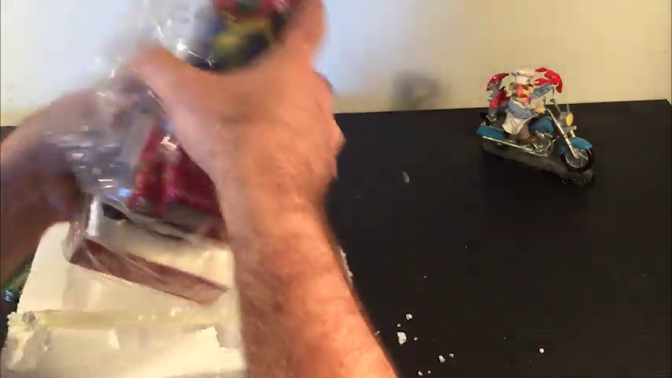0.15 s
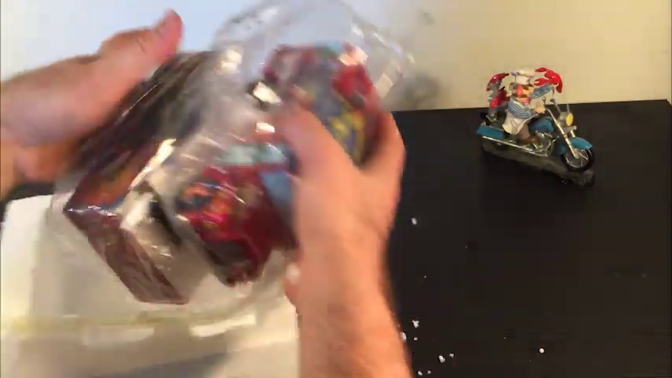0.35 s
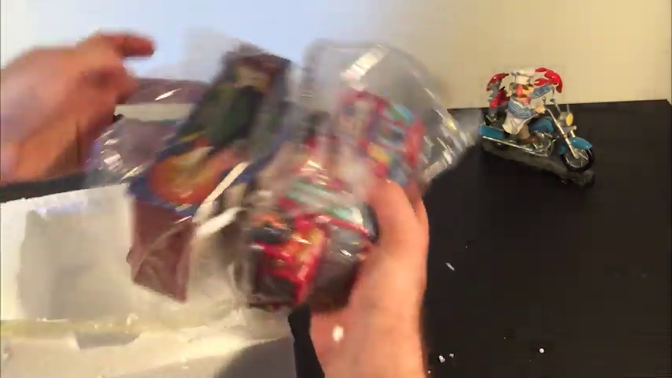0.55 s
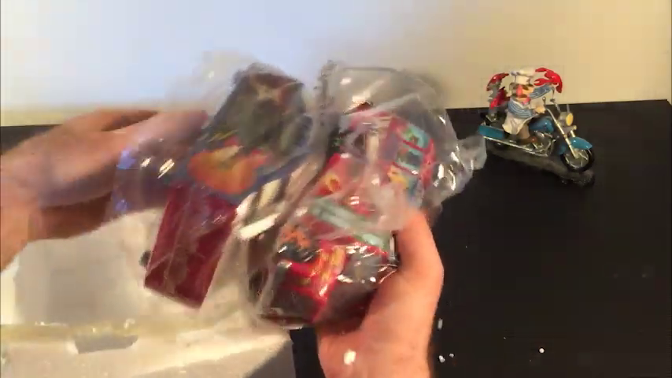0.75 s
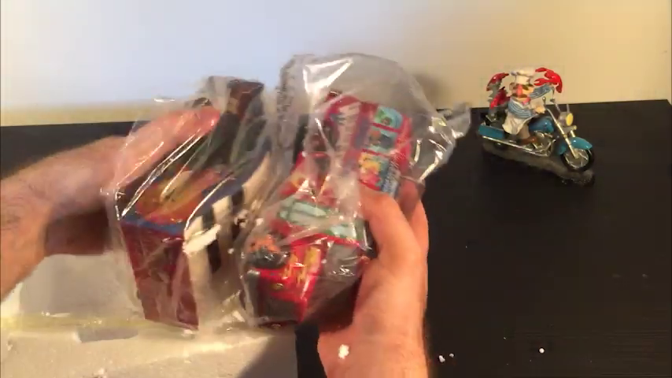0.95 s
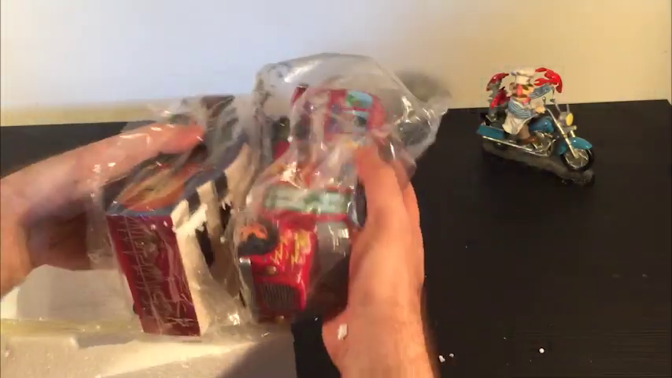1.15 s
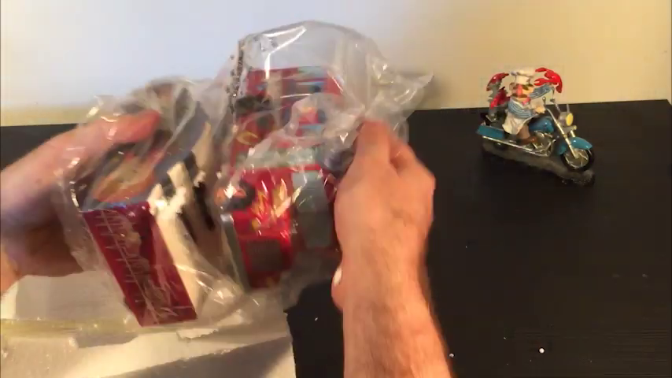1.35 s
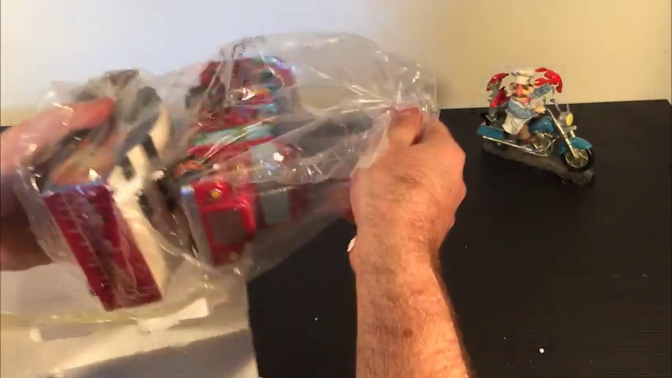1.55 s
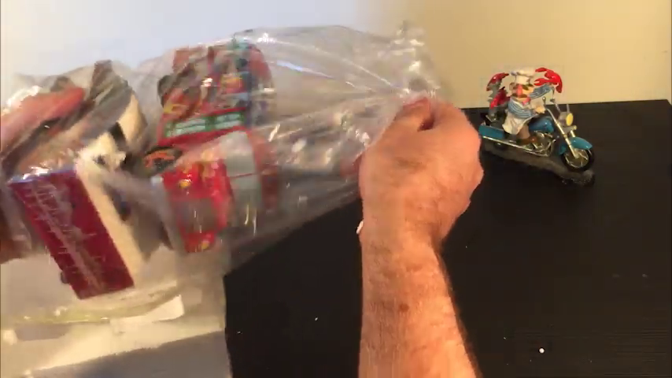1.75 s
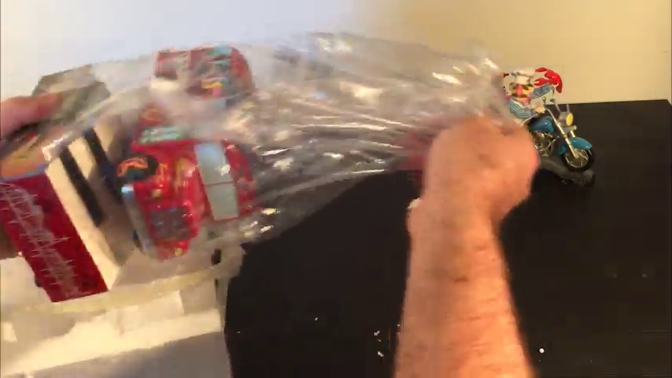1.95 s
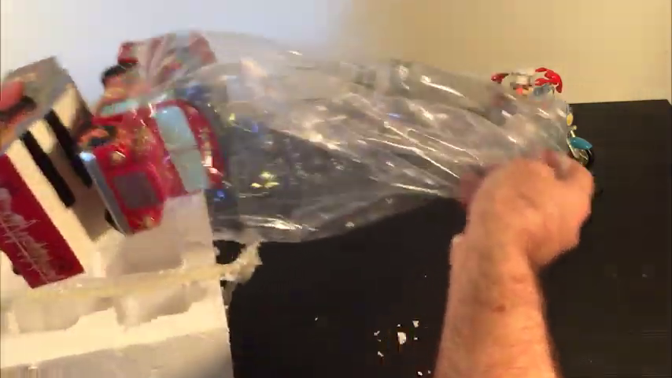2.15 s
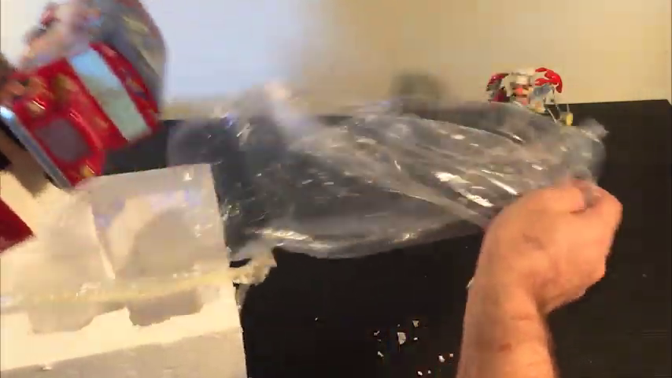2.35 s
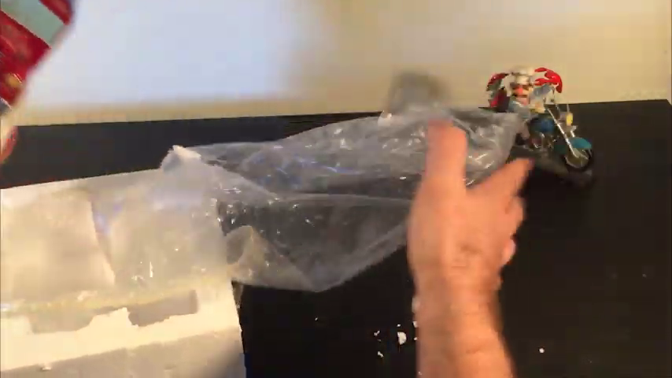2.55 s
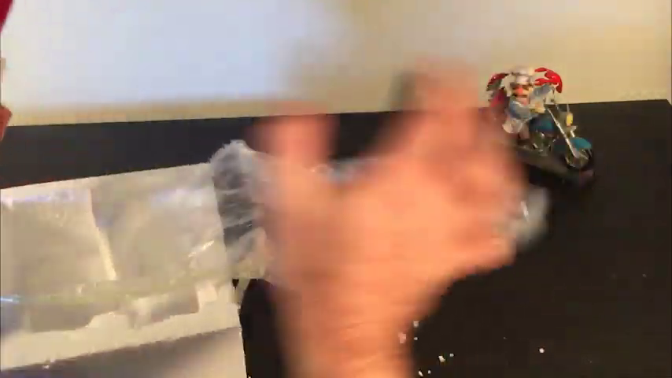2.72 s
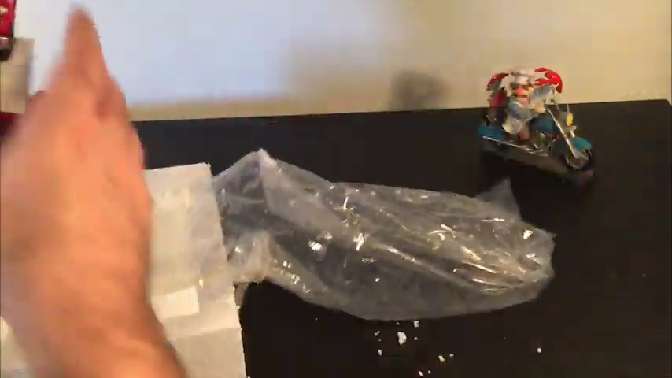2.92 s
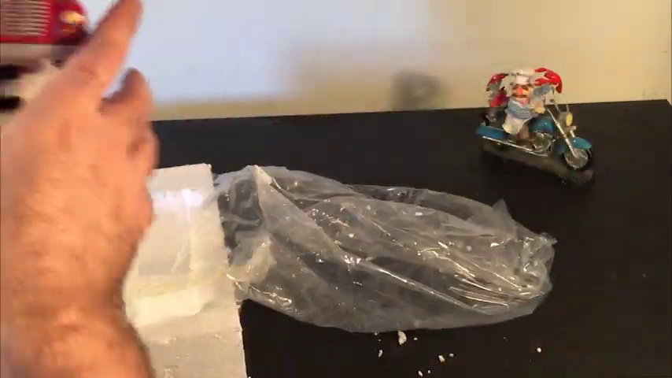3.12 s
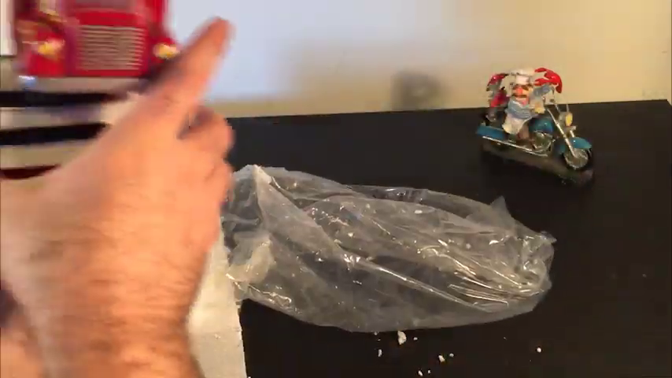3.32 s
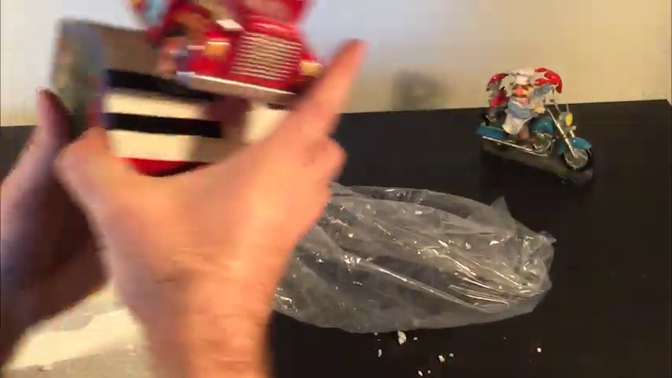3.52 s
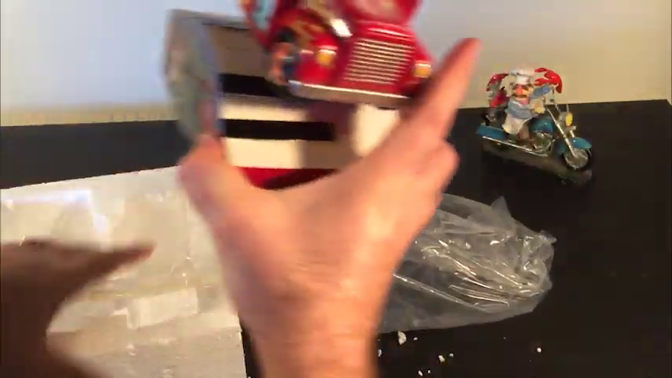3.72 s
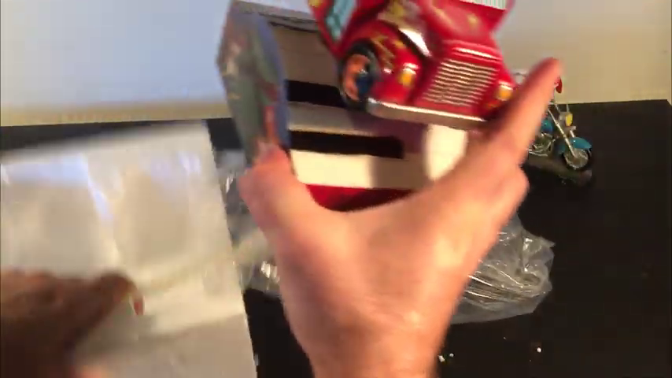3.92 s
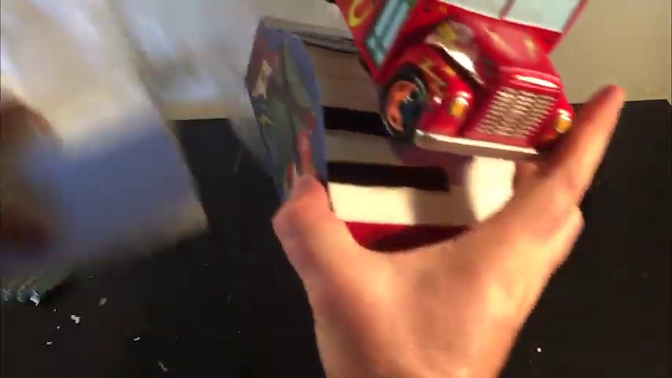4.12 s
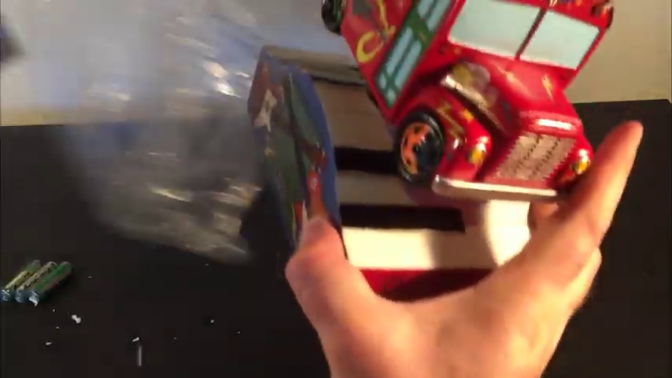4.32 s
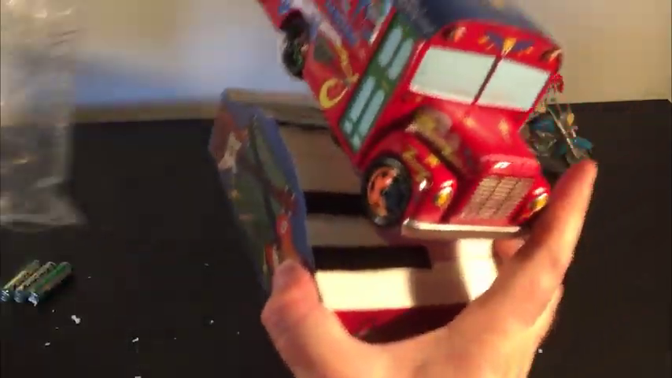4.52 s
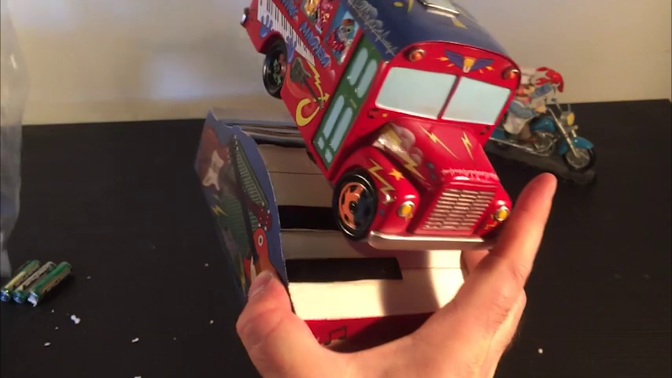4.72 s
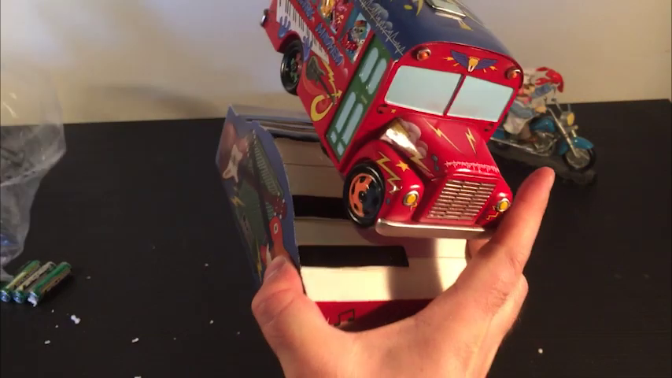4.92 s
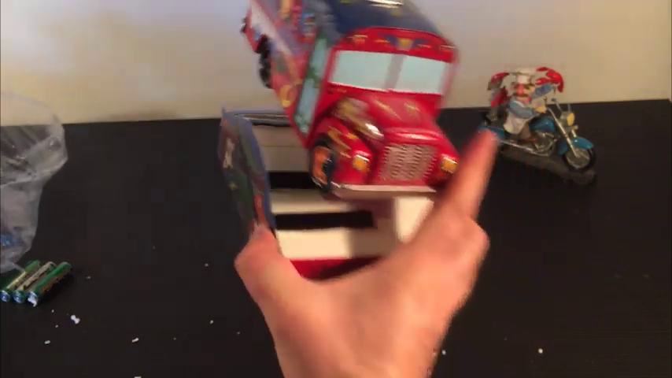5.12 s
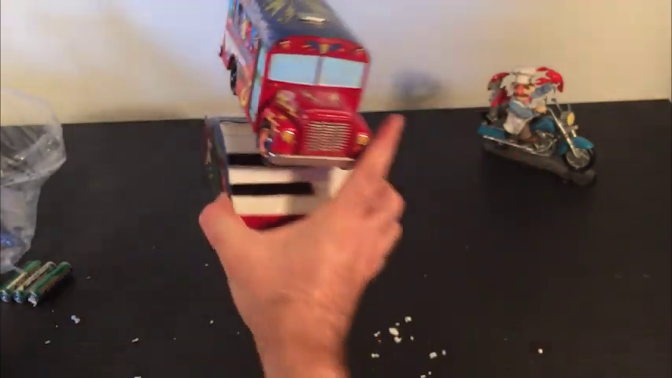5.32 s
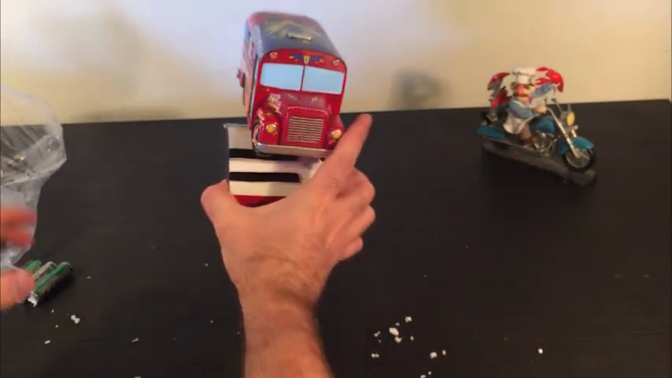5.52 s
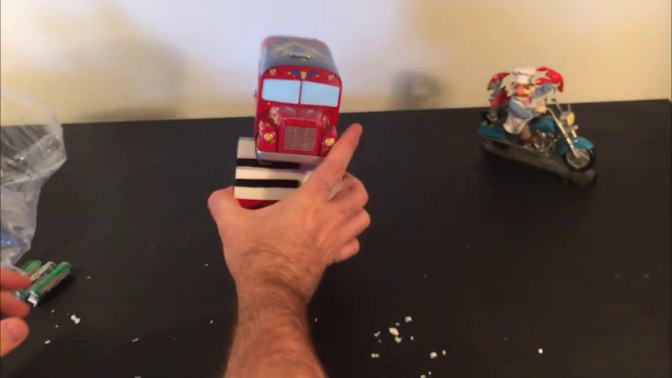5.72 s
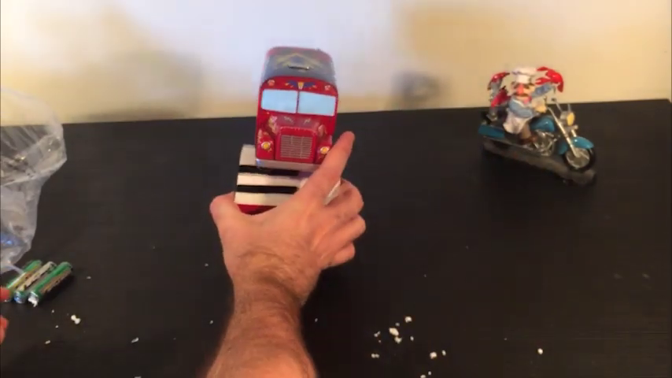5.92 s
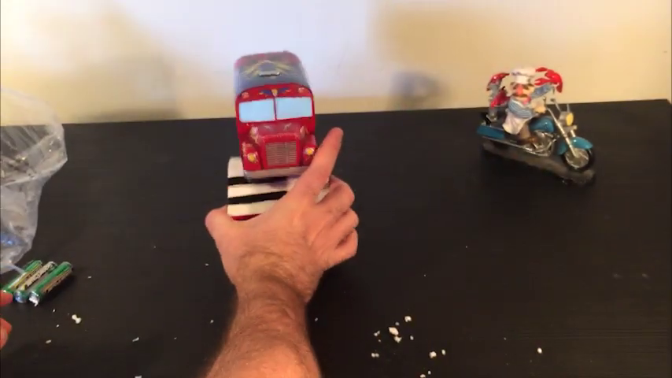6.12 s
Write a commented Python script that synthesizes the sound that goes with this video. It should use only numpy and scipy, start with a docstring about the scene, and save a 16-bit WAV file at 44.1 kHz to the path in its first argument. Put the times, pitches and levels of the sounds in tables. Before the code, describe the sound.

Thin plastic crinkles and snaps as it is pulled off a toy, then thins to scattered clicks and soft knocks on a wooden table.

```python
"""Dense crackle with single louder snaps: hands pull a thin plastic bag off an ornament, then slide
foam packing and bag aside. Creases in the film buckle as clicks; skin, film and foam rub briefly.
Things knock on a wooden table and ring its modes.
A small quiet room with a low rumble, heard by one microphone."""
import sys
import numpy as np
from scipy import signal
from scipy.io import wavfile

SR = 44100
rng = np.random.default_rng(int(sys.argv[2]) if len(sys.argv) > 2 else 0)


def wrap_up_sound(samples):
    """Save the sound to the file named by the first command line argument, as 16-bit audio."""
    columns = np.atleast_2d(samples).T
    # keep every value between -1 and 1, then stretch to whole-number steps
    tamed = np.clip(columns, -1, 1)
    steps = np.round(tamed * 32767).astype(np.int16)
    wavfile.write(sys.argv[1], SR, steps)


N = 276066
FULL_EFFORT_DB = -47


def crackle():
    """Creases buckle at random in clumps; each clicks around its own random pitch."""
    # film spectrum: (frequency [Hz], density [dB per Hz])
    film = [(59, -38), (100, -5.5), (315, -7.5), (406, -4.5), (471, -10.5), (721, -1.5), (784, -4.5),
            (1720, 0.5), (3320, -1), (13200, -6), (16000, -72)]
    level_db, treble_db, low_db, hollow_db = handling()
    creases_per_s = 18000 * amp(-0.21 * (level_db + 42))   # sparser when louder
    chance = np.clip(creases_per_s / SR, .01, 1)
    born = (rng.random(N) < chance) / np.sqrt(chance)   # more creases share the same power
    length = np.minimum(rng.exponential(1, N), 6)   # long creases: louder, broader clicks
    width_oct = 0.48 * (1 + .1 * length)
    clump_db = 1.5 * np.clip(0.4 * (FULL_EFFORT_DB + 12 - level_db), .3, 1.2)   # evener when loudest
    sizes = born * amp(2.8 * length) * amp(clump_db * drift(rate_hz=26.6))
    centre_oct = np.log2(24000) - np.minimum(rng.exponential(2.785, N), 8)   # mostly high and bright
    signs = rng.choice([-1, 1], (2, N))
    patches_db = [1.5 * drift(rate_hz=9.5) for _ in range(5)]   # resonances shift as the film deforms
    edges_hz = 90 * 2 ** np.arange(0, 7.9, 1 / 3)
    out = np.zeros(N)
    for k, (low_hz, high_hz) in enumerate(zip(edges_hz, edges_hz[1:])):
        hz = np.sqrt(low_hz * high_hz)
        reach = np.exp(-.5 * ((np.log2(hz) - centre_oct) / width_oct) ** 2)
        clicks = rms_one(band(sizes * reach * signs[k % 2], low_hz, high_hz)) * np.sqrt(high_hz - low_hz)
        bright = np.clip(np.log2(hz / 4000), 0, 1)
        deep = np.clip(np.log2(1400 / hz), 0, 1)
        hollow = np.interp(np.log2(hz / 2500), [-2.5, -1.3, -.5, .7, 1.5], [0, .6, .5, -.3, 0])
        db = level_db + bright * (treble_db - level_db + 0.5) + deep * (low_db - level_db + 11)
        db += hollow * (hollow_db + 1) + patches_db[k % 5]
        out += clicks * amp(at_hz(film, hz) + db - 35)
    return out


def handling():
    """How hard the hands work the film: level, treble, low rubbing and slack-fold hollowness in dB."""
    # hand moves: ((treble [dB], low rubbing [dB], hollowness [dB]), [(time [s], level [dB]), ...])
    moves = [ ((-1.2, -8.5, -4), [(0.0, -65.5), (0.046, -67), (0.142, -55), (0.208, -53), (0.297, -44),
             (0.411, -43.5), (0.561, -42.5), (0.59, -48.5), (0.619, -61.5)]), ((-4, -9.5, 2),
             [(0.702, -52.5), (0.764, -59.5), (0.87, -53), (0.954, -49.5)]), ((0, -6.5, 0), [(0.986, -54.5),
             (1.042, -50), (1.135, -49.5), (1.185, -65)]), ((0, -11.5, -4.5), [(1.27, -47), (1.357, -49.5),
             (1.417, -42), (1.513, -44), (1.601, -39), (1.852, -43.5), (1.97, -43.5), (2.347, -54)]),
             ((0, -14.5, 0), [(2.389, -45), (2.454, -51), (2.528, -48)]), ((-2.4, -10, 1), [(2.582, -56),
             (2.654, -42.5), (2.722, -58.5), (2.756, -70)]), ((-3, -7.5, 0.26), [(2.856, -60), (2.909, -67),
             (2.929, -46.5), (2.949, -54), (3.031, -67.5), (3.101, -70.5), (3.179, -71.5), (3.324, -80)]),
             ((-15, -8.5, 5.8), [(3.526, -80), (3.572, -69), (3.643, -65.5), (3.672, -56), (3.735, -71.5),
             (3.757, -83), (3.887, -82)]), ((-2, -13, 0.75), [(3.914, -73), (3.945, -46.5), (3.968, -52.5),
             (3.986, -41), (4.022, -35.5), (4.04, -40.5), (4.055, -49.5), (4.16, -44.5), (4.226, -53),
             (4.274, -50.5), (4.355, -70)]), ((-3, -17.5, 0), [(4.39, -54), (4.46, -60), (4.486, -51.5),
             (4.536, -73), (4.572, -59.5), (4.62, -73.5)]), ((-5, -7.5, 1.5), [(4.671, -57), (4.747, -57),
             (4.787, -44.5), (4.848, -49), (4.957, -56), (4.999, -44.5)]), ((-0.93, -8, -11), [(5.03, -51),
             (5.095, -50.5)]), ((-6, -11.5, 0), [(5.11, -44.5), (5.15, -45), (5.236, -57.5), (5.334, -78),
             (5.359, -61.5), (5.378, -72.5), (5.476, -81), (6.005, -85)]), ((-22, -1, 6.1), [(6.029, -55.5),
             (6.064, -66.5), (6.11, -70.5), (6.26, -80)]), ]
    points = [(s, db, *colour) for colour, curve in moves for s, db in curve]
    times_s, level_db, treble_db, low_db, hollow_db = np.transpose(points)
    treble_db = treble_db + 0.1951 * (level_db - FULL_EFFORT_DB)   # gentler is duller
    curves_db = level_db, level_db + treble_db, level_db + low_db, hollow_db
    return [np.interp(np.arange(N) / SR, times_s, curve) for curve in curves_db]


def snaps():
    """A single crease lets go and rings the panel beside it; its sharp edge adds treble."""
    # louder creases: (time [s], panel peak [dB], panel pitch [Hz], edge peak [dB])
    loud_snaps = [(0.0605, -48, 2110, -43), (0.1251, -40, 5030, -28), (0.1554, -34.5, 2960, -38),
                  (0.1647, -35.5, 5200, -41), (0.281, -33, 2020, -25.5), (0.498, -30, 4630, -23),
                  (0.5527, -34, 2000, -35), (0.6412, -38, 5000, -31.5), (0.6788, -54, 1940, -31),
                  (0.706, -33, 2920, -23), (0.7941, -42, 4070, -30), (0.8808, -42, 1870, -31),
                  (0.8944, -41, 4160, -22.5), (0.9427, -37, 1400, -41), (1.0026, -40, 3980, -26),
                  (1.0224, -33, 2060, -47), (1.049, -38, 6500, -27), (1.088, -49, 6830, -18.5),
                  (1.1221, -42, 1920, -26), (1.1466, -29, 4460, -29), (1.213, -40, 2260, -27),
                  (1.2315, -36, 4520, -26), (1.273, -34, 4150, -20.5), (1.426, -38, 3490, -23),
                  (1.461, -37, 7050, -29), (1.484, -43, 1700, -25.5), (1.5327, -27.5, 1930, -35),
                  (1.6395, -35, 3120, -32), (1.6913, -33, 1850, -24), (1.748, -36, 2930, -21),
                  (1.8919, -24.5, 5470, -16.5), (2.327, -37, 5700, -31.5), (2.3872, -31, 2560, -24.5),
                  (2.537, -35, 6310, -31), (2.6062, -30.5, 5800, -26), (2.6825, -40, 6180, -32),
                  (2.8595, -47, 2720, -39), (2.9539, -32, 5640, -28.5), (3.1103, -52, 5810, -43),
                  (3.204, -61, 890, -52), (3.5561, -51, 1730, -41), (3.5912, -45, 2680, -35.5),
                  (3.6205, -43, 2360, -53), (3.661, -22.5, 1910, -26), (3.831, -44, 6400, -46),
                  (3.912, -48, 2020, -40), (3.9397, -33, 3900, -45), (3.972, -31, 2500, -30),
                  (4.1734, -35.5, 1480, -25.5), (4.2776, -29, 1650, -38), (4.379, -38, 6000, -28),
                  (4.4907, -38.5, 4140, -40), (4.567, -39.5, 5960, -34), (4.7751, -45, 2330, -43),
                  (4.7849, -23.5, 2920, -28.5), (4.7994, -32, 2200, -45), (4.832, -32.5, 2270, -33),
                  (4.9803, -39, 1830, -51), (5.347, -44, 2700, -34), (5.3548, -43, 3700, -55),
                  (6.0262, -40, 1430, -60), (6.068, -54, 5430, -31)]
    out, t = np.zeros(N), np.arange(round(.05 * SR)) / SR
    rows = loud_snaps + lesser_snaps()
    bursts = rng.standard_normal((len(rows), len(t)))
    bursts[:, 0] = 4.45   # sudden release
    for (s, panel_db, hz, edge_db), burst in zip(rows, bursts):
        t60_s = 0.028 + 5 / hz
        panel = band(burst * amp(-60 * t / t60_s), hz / 1.45, hz * 1.61)
        panel += 0.021 * ring(panel, hz, t60_s=45 / hz)   # lowest mode: a hollow tock
        edge = band(burst * amp(-60 * t / 0.017), 4800, 22000)
        add(out, s, amp(panel_db) * panel / abs(panel).max() + amp(edge_db) * edge / abs(edge).max())
    return out


def lesser_snaps(count=60, spread_db=6.5, low_hz=1366, high_hz=6800):
    """Random rows for snaps(), as strong as the handling."""
    when, pitch, panel, edge = rng.random((count, 4)).T
    level_db, treble_db = [curve[(when * N).astype(int)] for curve in handling()[:2]]
    panel_db = level_db + 9.5 + spread_db * (panel - .5)
    edge_db = treble_db + 5.5 + spread_db * (edge - .5)
    hz = low_hz * (high_hz / low_hz) ** pitch
    return list(zip(when * N / SR, panel_db, hz, edge_db))


def knocks():
    """A soft push rings the thing that lands and the table's modes."""
    # landings: (time [s], level [dB], ring [Hz], overtone [Hz], t60 [s], table share [dB])
    landings = [(0.733, -42.5, 320, 420, 0.064, -20), (1.056, -39.5, 156, 685, 0.035, -17),
                (1.421, -55, 199, 400, 0.078, -22), (2.643, -48, 187, 720, 0.095, -21),
                (2.814, -53.5, 63, 463, 0.077, -3), (4.025, -38.5, 176, 280, 0.056, -3.5),
                (4.722, -40, 181, 511, 0.08, -9.5), (4.998, -27, 127, 342, 0.05, -21),
                (5.222, -37.5, 203, 644, 0.093, -10), (6.025, -29, 195, 317, 0.051, -3),
                (6.033, -30.5, 104, 315, 0.087, 11.5), (6.126, -41.5, 160, 294, 0.066, -9),
                (6.133, -44.5, 100, 286, 0.049, 17)]
    # table top modes: (frequency [Hz], level [dB], t60 [s])
    wood_modes = [(54.2, -21, 1), (103.8, -6.5, 0.27), (118.3, -6.5, 0.098), (159, -22, 0.2),
                  (229, -19, 0.28), (293, -22, 0.068), (450, -26, 0.11), (545, -27, 0.066)]
    out, t = np.zeros(N), np.arange(round(.5 * SR)) / SR
    push = np.hanning(round(0.0011 * SR) + 2)
    push = np.pad(push / push.sum(), (0, len(t) - len(push)))
    mode_gains = amp(rng.normal(0, 1, (len(landings), len(wood_modes))))
    modes = np.array([amp(db) * ring(push, hz, t60_s) for hz, db, t60_s in wood_modes])
    for (s, db, hz, overtone_hz, t60_s, table_db), gains in zip(landings, mode_gains):
        thing = 0.86 * ring(push, hz, t60_s) - 1.23 * ring(push, overtone_hz, 0.59 * t60_s)
        add(out, s, amp(db) * (thing + amp(table_db) * gains @ modes))
    return out


def rubs(grain_db=2, edge_ratio=1.145):
    """Skin, film and foam rub: grainy friction noise through one hollow resonance."""
    # rubs: (start [s], length [s], centre [Hz], level [dB])
    strokes = [(0.215, 0.17, 2000, -50), (0.394, 0.07, 760, -50), (0.487, 0.053, 405, -50),
               (1.004, 0.037, 700, -54), (1.56, 0.18, 3100, -46.5), (1.689, 0.15, 674, -51.5),
               (2.933, 0.083, 1510, -60.5), (3.665, 0.085, 2400, -66.5), (3.663, 0.029, 820, -55.5),
               (3.988, 0.056, 764, -45), (4.28, 0.11, 1750, -58), (4.689, 0.058, 603, -56),
               (4.81, 0.11, 2390, -57), (5.109, 0.081, 990, -52)]
    out = np.zeros(N)
    friction = rng.standard_normal(N) * amp(grain_db * drift(rate_hz=72))
    for start_s, length_s, hz, db in strokes:
        i, n = round(start_s * SR), round(length_s * SR)
        tone = band(friction[i:i + n], hz / edge_ratio, hz * edge_ratio)
        add(out, start_s, amp(db) * rms_one(tone) * signal.windows.tukey(n, 0.5))
    return out


def room(x, onset_s=0.008):
    """Dense reflections build up and die away."""
    # reverberation bands: (from [Hz], to [Hz], t60 [s], gain [dB])
    tail_bands = [(60, 1200, 0.19, -33), (1540, 3660, 0.19, -33.5), (4700, 14000, 0.18, -33.5),
                  (10200, 21000, 0.36, -40.5)]
    t = np.arange(SR // 2) / SR
    noise = rng.standard_normal(len(t)) * np.clip(t / onset_s, 0, 1)
    tail = sum(amp(db - 60 * t / t60_s) * band(noise, low_hz, high_hz)
               for low_hz, high_hz, t60_s, db in tail_bands)
    return signal.fftconvolve(x, tail)[:N]


def air(rms_db=-65):
    """Steady room rumble and microphone hiss."""
    # noise floor: (frequency [Hz], relative density [dB per Hz])
    floor_spectrum = [(15, -42), (25, -27.5), (59, 8), (74, -15.5), (87, -21), (108, -9.5), (170, -10),
                      (195, -8), (236, -13.5), (317, -15), (373, -16.5), (677, -27.5), (14000, -39.5),
                      (16000, -76)]
    edges_hz = 30 * 2 ** np.arange(0, 9.4, 1 / 3)
    white, out = rng.standard_normal((2, N)), np.zeros(N)
    for k, (low_hz, high_hz) in enumerate(zip(edges_hz, edges_hz[1:])):
        db = at_hz(floor_spectrum, np.sqrt(low_hz * high_hz))
        out += amp(db) * band(white[k % 2], low_hz, high_hz)
    return amp(rms_db) * rms_one(out)


def amp(db):
    """dB to gain."""
    return 10 ** (np.asarray(db) / 20)


def rms_one(x):
    """Scale to rms 1."""
    return x / np.sqrt(np.mean(x ** 2) + 1e-20)


def at_hz(points, hz):
    """Read a spectrum on a log-frequency axis."""
    points_hz, points_db = np.transpose(points)
    return np.interp(np.log(hz), np.log(points_hz), points_db)


def drift(rate_hz):
    """Slow random curve of rms 1, drawn at every 20th sample."""
    r = np.exp(-40 * np.pi * rate_hz / SR)
    slow = signal.lfilter([1], [1, -2 * r, r * r], rng.standard_normal(N // 20 + 2002))[2000:]
    return np.interp(np.arange(N) / 20, np.arange(len(slow)), rms_one(slow))


def band(x, low_hz, high_hz):
    """Butterworth band-pass."""
    return signal.sosfilt(signal.butter(2, [low_hz, high_hz], "band", fs=SR, output="sos"), x + 1e-18)


def ring(x, hz, t60_s):
    """Resonator: a unit click starts a dying sine of height 1."""
    r, w = amp(-60 / (max(t60_s, 1e-3) * SR)), 2 * np.pi * hz / SR
    return signal.lfilter([0, np.sin(w)], [1, -2 * r * np.cos(w), r * r], x)


def add(out, start_s, x):
    """Mix x into out."""
    i = round(start_s * SR)
    out[i:i + len(x)] += x[:N - i]


def scene():
    """Film, rubs and knocks in the room, air under all."""
    near = crackle() + snaps() + rubs() + knocks()
    return (near + room(near) + air())[None]


def record(dry):
    """The microphone housing cuts two dips; deepest bass and top are cut off."""
    # housing dips: (centre [Hz], width [Hz], gain [dB])
    dips = [(4910, 196, -9), (10620, 530, -7)]
    low_cut_hz, high_cut_hz = 45, 16100
    for hz, width_hz, db in dips:
        b, a = signal.iirpeak(hz, hz / width_hz, fs=SR)
        dry = dry - (1 - amp(db)) * signal.lfilter(b, a, dry)
    dry = signal.sosfilt(signal.butter(4, low_cut_hz, "high", fs=SR, output="sos"), dry)
    return signal.sosfilt(signal.cheby2(20, 70, high_cut_hz, fs=SR, output="sos"), dry)


dry = scene()
out = record(dry)
wrap_up_sound(out)
```